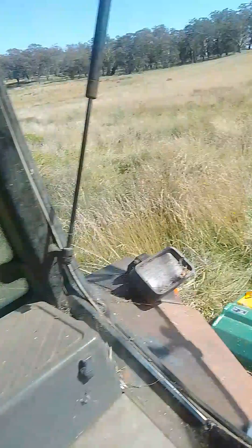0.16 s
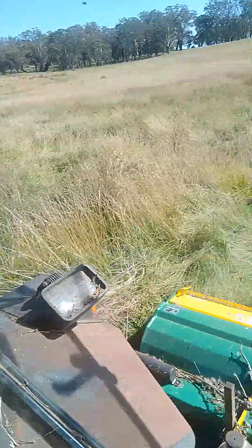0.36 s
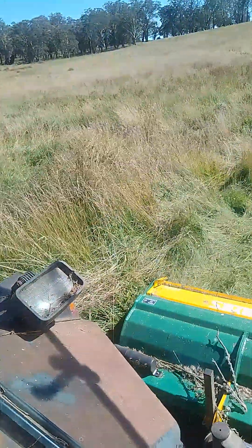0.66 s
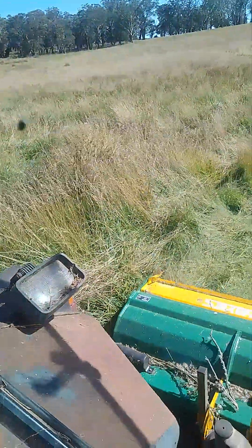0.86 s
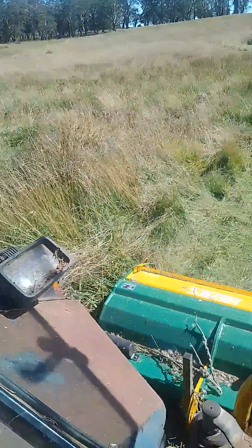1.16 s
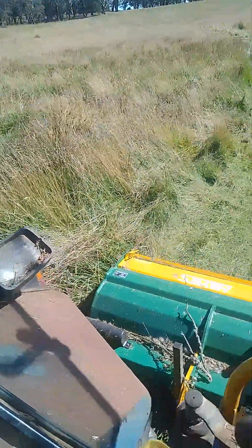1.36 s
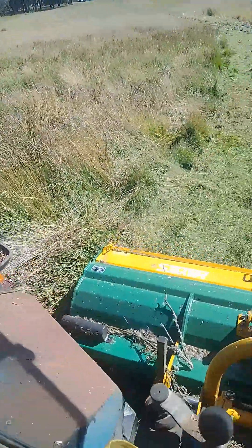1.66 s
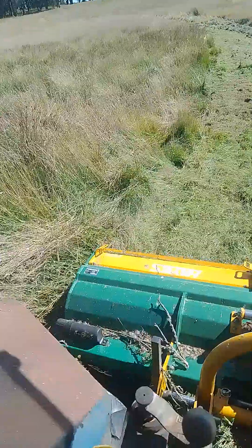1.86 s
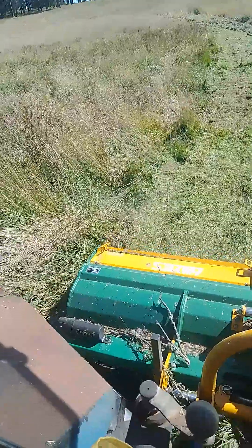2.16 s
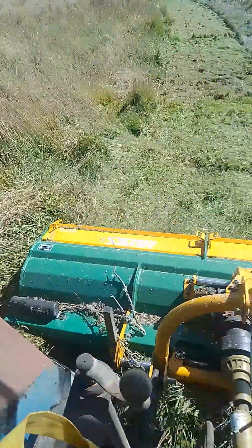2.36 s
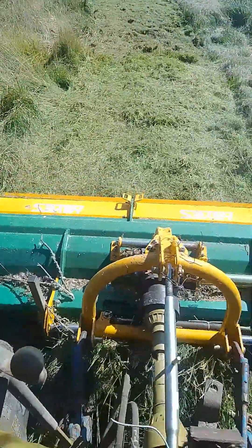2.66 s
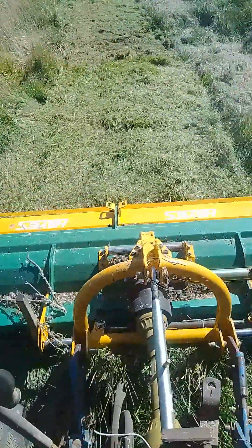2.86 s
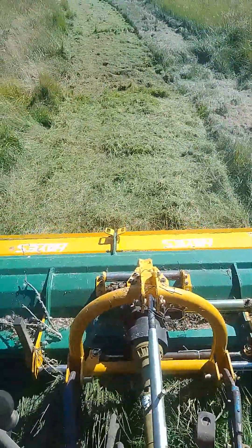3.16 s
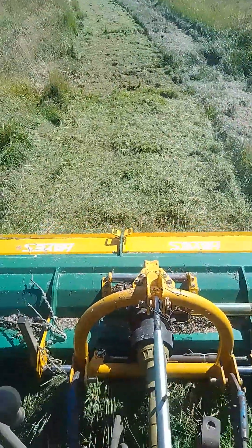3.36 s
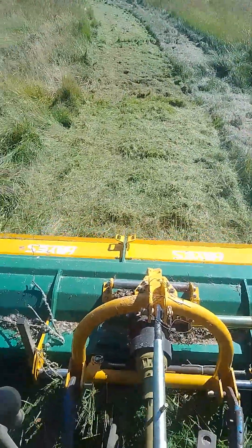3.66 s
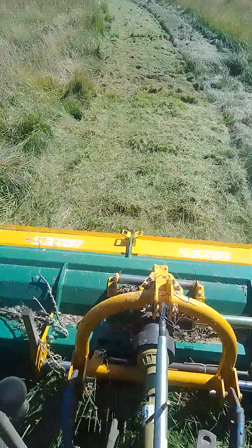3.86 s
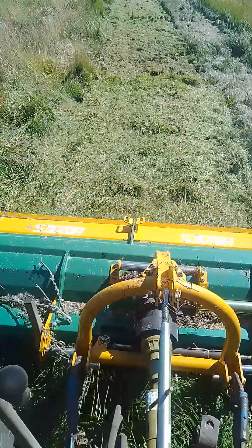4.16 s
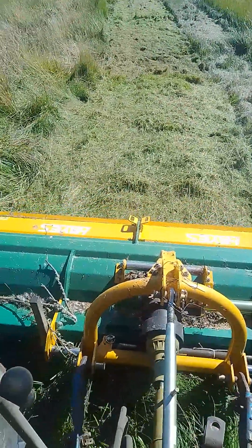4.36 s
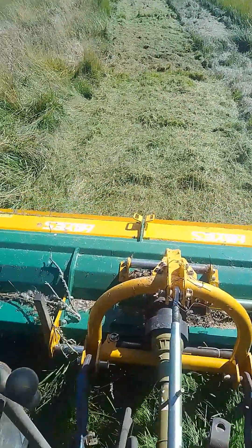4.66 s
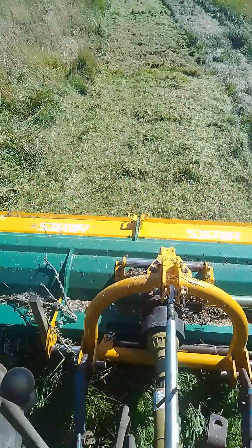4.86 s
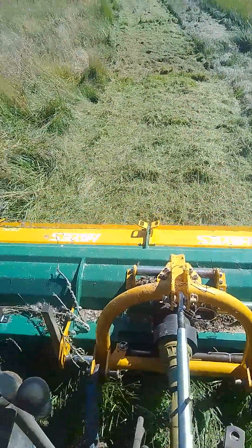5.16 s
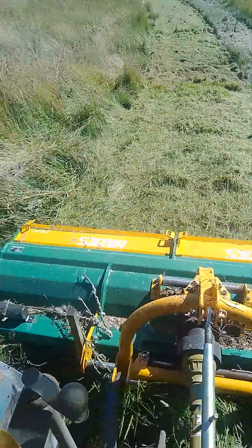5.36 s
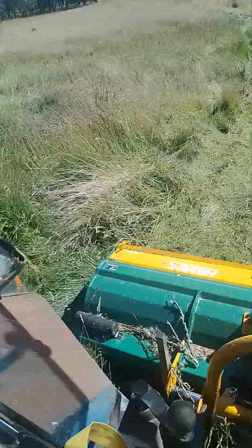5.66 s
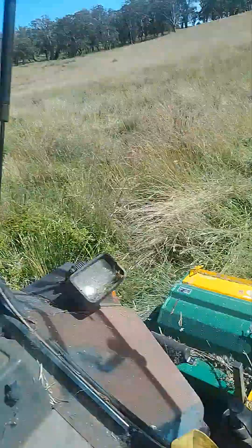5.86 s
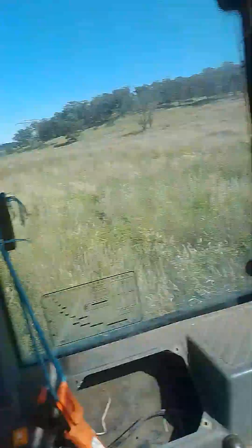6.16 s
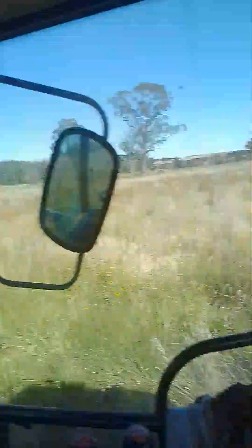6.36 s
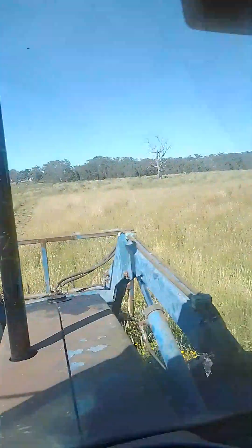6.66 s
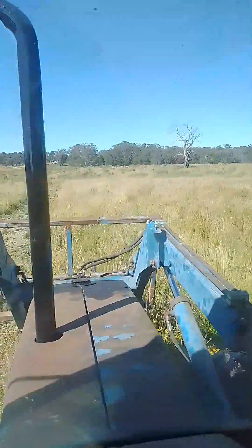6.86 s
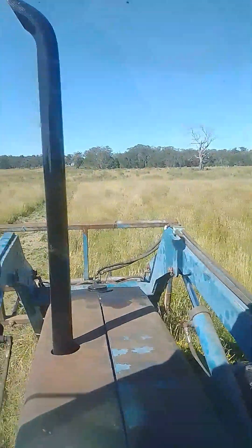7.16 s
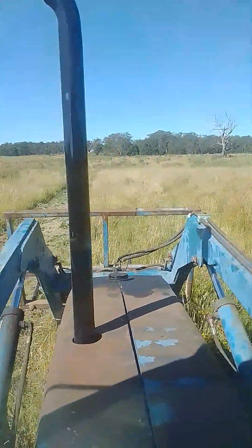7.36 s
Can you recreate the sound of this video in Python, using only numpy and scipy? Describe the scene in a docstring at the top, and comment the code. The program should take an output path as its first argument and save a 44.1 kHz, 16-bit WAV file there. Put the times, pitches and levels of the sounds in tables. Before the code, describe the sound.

A tractor pulls a flail mower through thick grass, heard on one hand-held microphone in the cab. A broad engine roar and a slightly wavering whine run throughout. Cut stems hiss, and the flails crack on clumps and ring briefly, with a few tiny squeaks early on. The whine grows stronger in the middle as the microphone faces the mower. Near the end it swings forward, and the sound turns duller and a little quieter.

```python
"""In the cab of a tractor that pulls a flail mower through thick grass.
The tooth pulses of a gear pump make a harmonic whine over the broadband roar of engine and hood.
Flails thrash the stems, crack on clumps and ring on their shackles. A hand-held mono microphone swings
from the side to the open rear window and then to the windscreen, which recolours the sound."""
import sys
import numpy as np
from scipy import signal
from scipy.io import wavfile
from scipy.ndimage import uniform_filter1d

SR = 44100
rng = np.random.default_rng(int(sys.argv[2]) if len(sys.argv) > 2 else 0)


def to_wav(s):
    """Save 16-bit WAV."""
    ch = np.atleast_2d(s).T  # columns
    pcm = np.round(np.clip(ch, -1, 1) * 32767)  # PCM
    wavfile.write(sys.argv[1], SR, pcm.astype(np.int16))


N = 331191

# microphone aim and tone colour: t/s, aim for the tractor (0 side, 1 rear, 2 front), tone colour of the thrash
# and cracks (0 to 2, blending their three spectra)
MIC_AIM = [(0, 0.5, 0.), (.6, 0.27, 0.033), (1.2, 0.84, 0.), (1.7, 1.66, 0.55), (2.1, 0.76, 0.9),
           (2.4, 1.3, 0.64), (2.7, 1.1, 0.48), (3.3, 1., 0.88), (4.3, 1., 0.085), (5.3, 1., 0.89),
           (5.7, 1.2, 0.58), (5.9, 0.74, 0.7), (6.15, 2, 0.097), (6.4, 1.6, 0.5), (6.55, 2, 1.73),
           (7, 1.83, 1.2), (7.51, 1.7, 2.07)]
# pump tooth rate, to which rotor and engine are geared: t/s, f/Hz
TOOTH_RATE = [(0, 250.6), (.5, 248.9), (1, 247.6), (1.5, 244), (1.75, 244.5), (2.1, 246.4), (2.5, 246.5),
              (3.15, 246.1), (3.55, 246.7), (3.8, 246.6), (4.25, 243.4), (4.5, 246.3), (4.75, 247.5),
              (5.2, 246.5), (5.55, 247.8), (5.8, 247.2), (6.25, 243.3), (6.75, 245.8), (7, 241.2),
              (7.25, 240.6), (7.51, 242.7)]
# harmonic numbers of the whine
PUMP_HARMONICS = (1, 2, 4, 5, 6, 7, 8, 9, 3, 10, 18, 19)
# steady part of each harmonic: level/dB at side, rear, front
PUMP_LEVELS = [(-42.5, -38.5, -42.5), (-42, -36, -43), (-37.5, -32.5, -39), (-44.5, -39.5, -32.5),
               (-35, -33, -36.5), (-45, -49, -41), (-45, -40, -46), (-31, -41.5, -41), (-50, -46, -40.5),
               (-40, -39, -40), (-47, -49, -53), (-44, -45, -52)]
# swells of each harmonic as the cab's standing waves pass the microphone: centre t/s, length/s, level/dB
STANDING_WAVES = [
    [(1.95, 0.43, -40), (6.42, 0.52, -31)],
    [(1.9, 1.2, -36), (3.5, 2.3, -38.5)],
    [(.6, 0.72, -31.5), (2., 0.95, -30.5), (2.75, 0.45, -31), (3.65, 1.014, -23), (4.75, 0.68, -25.5),
     (5.45, 0.65, -20.5), (6.75, .3, -29)],
    [(1.6, 0.66, -37), (2.75, 0.66, -28), (4.15, 0.75, -24), (4.9, 0.93, -26), (5.9, 0.24, -30.5),
     (6.8, 0.65, -27.5)],
    [(1., 0.64, -36), (2.05, .5, -33), (2.95, 1.1, -27.5), (4.1, 0.81, -24.5), (5.1, 0.55, -30),
     (5.85, 0.41, -30)],
    [(1.35, 0.26, -34), (3.5, 0.97, -30), (4.85, 0.58, -26.5), (5.35, 0.5, -28), (5.85, 0.37, -32),
     (7.2, 0.73, -31.5)],
    [(.15, 0.22, -30), (.7, 0.55, -35), (3.35, 0.68, -36), (4.85, 0.4, -33), (5.45, 1, -35), (7., .8, -35)],
    [(.58, 0.34, -26.5), (2.25, 1.1, -34), (3.8, 0.44, -36), (4.9, 0.86, -29), (5.55, 0.44, -24),
     (6.58, 0.21, -28.5)],
    [(1.1, 0.47, -37), (4.6, .4, -42), (7.35, 0.7, -39)],
    [(.95, .5, -34.5), (2.55, .2, -35), (4.75, .7, -39.5), (5.85, .3, -34)],
    [(2.2, 1., -37), (4.15, .6, -36)],
    [(2.3, .6, -40), (5.2, 1.4, -38)],
]
# tones of a shaft at a quarter of the tooth rate: multiple of tooth rate, level/dB re harmonic 4
SIDEBANDS = [(3.75, -11.5), (4.25, -16.)]
# strength of the two main noises: t/s, roar level/dB, thrash level/dB
NOISE_LEVELS = [(0, -22.5, -21), (.4, -21, -17.8), (1.3, -21, -17.4), (1.7, -20, -18), (2.2, -20, -19),
                (2.6, -18.5, -19.5), (3.1, -18.5, -20.5), (3.5, -19.8, -21.5), (4.1, -21, -22),
                (4.5, -18.5, -20), (4.9, -20.3, -23.5), (5.2, -20, -23.5), (5.6, -21.5, -22),
                (5.85, -21, -20.8), (6.2, -22.8, -21), (6.55, -23, -25), (7, -23, -25), (7.25, -25, -27),
                (7.51, -23, -25.5)]
# spectra of engine and hood, cut stems and blows: f/Hz, relative level/dB; the roar has one per aim (side,
# rear, front), the thrash and cracks one per step of tone colour
ROAR_SPECTRA = [
    [(12, -55), (20, -23), (54, -36), (108, -22), (174, -37), (235, -10), (339, -11.5), (403, -4),
     (570, -8), (805, -10), (978, -6.5), (1160, -7), (2080, -8.5), (2270, -2), (3500, -10.5), (4550, -30),
     (7700, -120)],
    [(12, -71), (20, -71), (108, -25), (174, -43), (235, -16), (298, -16.5), (490, -10.5), (608, -12.5),
     (805, -9), (978, -0.5), (1140, -5), (1470, -3.5), (1570, -7), (2220, -8), (3500, -29), (4550, -64),
     (7700, -120)],
    [(12, -51), (20, -15), (120, -18.5), (174, -27), (235, -6.5), (412, -8.5), (490, -3.5), (534, -7.5),
     (957, -4.5), (1110, -6), (1210, 1), (1540, -10.5), (1680, 3.5), (1790, -1.5), (3500, -14.5),
     (4550, -45), (7700, -120)],
]
THRASH_SPECTRA = [
    [(1470, -26), (2500, -4), (3000, -7), (4020, -4), (4340, -2.5), (5420, -3), (7950, -1.5), (9630, -7.5),
     (10500, -12), (13400, -11.5), (15600, -12.5)],
    [(1470, -46), (2500, -1), (3240, -2.5), (4240, 2), (4940, 0), (5300, -0.5), (5990, -2.5), (8200, -3),
     (10800, -15), (13500, -10), (15600, -12)],
    [(1470, -27), (2500, -10), (2560, -12), (3750, -6), (4610, -14), (5060, -9.5), (6080, -15), (8260, -15),
     (10600, -23), (12900, -21), (15600, -35)],
]
CRACK_SPECTRA = [
    [(1500, -40), (3000, -16), (4500, -6), (6000, -2), (8000, 0), (10500, -12), (13000, -15), (15600, -18)],
    [(1500, -40), (3000, -16), (4500, -4), (6000, -2), (8000, 0), (10500, -7), (13000, -7), (15600, -10)],
    [(1500, -40), (3000, -12), (4500, -2), (6000, -2), (8000, -3), (10500, -10), (13000, -13), (15600, -17)],
]
# panel resonances: f/Hz, width/Hz, gain/dB at side, rear, front
PANEL_MODES = [(109.4, 14.5, 18, 9, 4.), (130, 12, 5., 7., 9.4), (319, 27, 7.5, 0.65, 13),
               (399.5, 52, 7.5, 10.2, 1.1), (535.5, 10.3, 3, 10.2, 2.), (598, 27, 4, 0.89, 10),
               (704, 71, 9, 2.6, 1.2), (937, 64, 6, 1.1, 1.82), (975, 44, 2, 3.9, 3.9),
               (1320, 46, -2, 2.7, 3.97), (2230, 31, 7., 3.6, 6.8)]
# clumps struck hard: t/s, puff level/dB, f/Hz near which the flail rings
HARD_BLOWS = [(0.028, -17, 6800), (.0618, -14.5, 7340), (.1022, -15, 7300), (0.139, -13, 7340),
              (.2199, -9.5, 7830), (0.25, -19, 6980), (.2882, -13, 8060), (0.41, -11, 7200),
              (.5162, -21, 5030), (.556, -13, 4360), (.7048, -15, 5930), (.7452, -20, 7200),
              (.8205, -13, 8260), (.8934, -23, 4800), (.9308, -16, 7980), (.9752, -15, 8060),
              (1.0485, -16, 5850), (1.131, -15, 8140), (1.1682, -13, 8000), (1.271, -12, 7050),
              (1.4331, -14, 6660), (1.508, -16, 6400), (1.5469, -17, 7940), (1.6626, -15, 4260),
              (1.8956, -18, 4730), (1.9732, -23, 4870), (2.0113, -18, 5620), (2.2403, -19, 7360),
              (2.6983, -20, 4630), (2.8913, -19, 7020), (3.1213, -16.5, 5690), (3.1916, -18, 4730),
              (3.5952, -18, 6780), (3.9025, -19, 4384), (4.1475, -18, 6280), (4.4243, -15.5, 7470),
              (5.2889, -21.5, 4695), (5.512, -16.5, 6930), (5.6655, -17.5, 4470), (5.7583, -19, 8200),
              (5.8341, -22, 4660), (6.12, -16.5, 6900)]
# flail resonances: f/Hz, relative level/dB, T60/s
FLAIL_MODES = [(4340, -25, 0.038), (5160, 2, 0.047), (5870, -5, 0.054), (6700, 2, 0.034), (7390, -3, 0.053),
               (8000, -1, 0.042), (8470, 5.5, 0.043), (8300, -4, 0.02)]
# a shackle rubs: t/s, length/s, f/Hz, level/dB
SHACKLE_RUBS = [(.422, .03, 4366, -23), (.553, .03, 4360, -22), (1.245, .04, 4370, -26),
                (1.29, .03, 4360, -26), (1.46, .06, 4250, -26), (1.533, .015, 4440, -25)]
# hum of rotor and engine: harmonic number, relative level/dB
ROTOR_ORDERS = [(1, 2), (2, -17), (3, -15), (4, 11), (5, 9)]
ENGINE_ORDERS = [(1, -0.5), (2, -8)]
# base of the hum, rotor then engine: level/dB at side, rear, front
HUM_LEVELS = [(-61, -76, -61), (-59, -63, -50)]

ROTOR_PER_TOOTH, FIRINGS_PER_TOOTH = .10615, .2053


def pump_whine(t, tooth_cycles, rotor_turns, aim):
    """Periodic tooth pulses give harmonics that sag with load; rotor unbalance modulates their amplitude."""
    tooth_cycles = tooth_cycles + np.cumsum(.17 * drift(5)) / SR
    levels_db = []
    for steady_db, swells in zip(PUMP_LEVELS, STANDING_WAVES):
        power = gain_of(aimed(steady_db, aim)) ** 2 + sum(swell(t, *row) ** 2 for row in swells)
        levels_db.append(10 * np.log10(power))
    orders = list(zip(PUMP_HARMONICS, levels_db)) + [(k, db + levels_db[2]) for k, db in SIDEBANDS]
    flutter = 1 + (.12 + .1 * drift(2)) * np.cos(2 * np.pi * rotor_turns)
    return flutter * tones(tooth_cycles, orders, waver_db=1.6, waver_hz=20, skirt=.035)


def engine_roar(level_db):
    """Broadband noise is filtered by the panel resonances of cab and hood."""
    gain = gain_of(level_db + .98 * drift(18.7))
    return gain * blended_noise(ROAR_SPECTRA, size=4096, patchy_db=1, blend_column=0, peaks=PANEL_MODES)


def stem_thrash(level_db, rotor_turns):
    """Countless cuts merge into hiss; the rows of flails modulate its treble once and twice a turn."""
    angle = 2 * np.pi * rotor_turns
    pulse_db = (.15 + .35 * drift(8)) * np.cos(angle) + .21 * np.cos(2 * angle)
    hiss = blended_noise(THRASH_SPECTRA, size=512, patchy_db=1.2, blend_column=1)
    low = signal.oaconvolve(hiss, signal.firwin(101, 4200, fs=SR), "same")
    body = low * gain_of(1.47 * drift(26))
    treble = (hiss - low) * gain_of(pulse_db + .56 * drift(17))
    return gain_of(level_db) * (body + treble)


def flail_cracks(level_db, rotor_turns, rise_s=.0045, cut_at_turn=.76, stray_per_s=25):
    """Impacts give noise puffs that add in power: hard blows, one cut each turn and strays at random."""
    t = np.arange(1500) / SR
    envelope = (t / rise_s * np.exp(1 - t / rise_s)) ** 1.5
    onsets, puff_db, _ = np.transpose(HARD_BLOWS)
    power = impulses(onsets, gain_of(puff_db) ** 2)
    each_turn = np.diff(np.floor(rotor_turns - cut_at_turn), prepend=-1) > 0
    turn_db = level_db - 5.5 + 2.5 * rng.standard_normal(N)
    power += gain_of(turn_db) ** 2 * each_turn
    stray_db = level_db - 4.5 + 1.2 * np.minimum(rng.exponential(1, N), 3)
    power += gain_of(stray_db) ** 2 * (rng.random(N) < stray_per_s / SR)
    gain = np.sqrt(abs(signal.oaconvolve(power, envelope ** 2)[:N]))
    return gain * blended_noise(CRACK_SPECTRA, size=256, patchy_db=3, blend_column=1)


def flail_clinks(level_db, ring_db=5, taps_per_s=20):
    """Damped modes ring freely: a hard blow excites those near its pitch, faint random taps excite all."""
    t, out = np.arange(4000) / SR, np.zeros(N)
    onsets, puff_db, near_hz = np.transpose(HARD_BLOWS)
    for hz, db, t60 in FLAIL_MODES:
        excitation = gain_of(puff_db + ring_db) / (1 + ((hz - near_hz) / 500) ** 2)
        taps = gain_of(level_db - 7) * rng.standard_normal(N) * (rng.random(N) < taps_per_s / SR)
        mode = gain_of(db - 60 * t / t60) * np.minimum(t / .008, 1) * np.sin(2 * np.pi * hz * t)
        out += signal.oaconvolve(impulses(onsets, excitation) + taps, mode)[:N]
    return out


def shackle_squeaks(t):
    """Friction in a shackle sustains a short pure tone with soft ends."""
    out = np.zeros(N)
    for onset, length, hz, db in SHACKLE_RUBS:
        envelope = np.exp(-(2 * (t - onset) / length - 1) ** 4)
        out += np.sqrt(2) * gain_of(db) * envelope * np.sin(2 * np.pi * hz * t)
    return out


def machine_hum(rotor_turns, firings, aim):
    """Rotor unbalance and engine firing force vibration at low harmonics of their rates."""
    rotor_gain, engine_gain = (gain_of(aimed(db, aim)) for db in HUM_LEVELS)
    rotor = rotor_gain * tones(rotor_turns, ROTOR_ORDERS, waver_db=1.5, waver_hz=4)
    return rotor + engine_gain * tones(firings, ENGINE_ORDERS, waver_db=1.5, waver_hz=3)


def moan(t, hz=420, fade_s=1.2):
    """Random modulation spreads a tone into a narrow band; it swells once and fades."""
    envelope = gain_of(-43) * np.exp(-(t / fade_s) ** 6) + swell(t, centre=.68, length=.28, db=-34)
    angle = 2 * np.pi * hz * t
    return envelope * ((2.1 + drift(11)) * np.cos(angle) + drift(7) * np.sin(angle)) / 1.4


def tones(cycles, orders, waver_db, waver_hz, skirt=0):
    """Wavering partials superpose; quadrature noise adds a skirt that grows with the order."""
    out = 0
    for k, db in orders:
        angle = 2 * np.pi * (k * cycles + rng.random())
        gain = gain_of(db + waver_db * drift(waver_hz))
        out += gain * (np.sin(angle) + skirt * k * drift(22) * np.cos(angle))
    return np.sqrt(2) * out


def blended_noise(spectra, size, patchy_db, blend_column, peaks=()):
    """Fourier synthesis of unit-rms noise whose spectrum blends between the given spectra along one column of
    MIC_AIM (aim or tone colour), with drifting patches."""
    hop = size // 4
    frames, hz = N // hop + 5, np.fft.rfftfreq(size, 1 / SR)
    aim = np.clip(curves(MIC_AIM, np.arange(frames) * hop / SR)[blend_column], 0, 2)
    db = 0
    for k, points in enumerate(spectra):
        point_hz, point_db = np.transpose(points)
        shape_db = np.interp(np.log(hz + 1), np.log(point_hz), point_db)
        shape_db += sum(boost[k] / (1 + (2 * (hz - f) / width) ** 2) for f, width, *boost in peaks)
        db += np.outer(shape_db, np.maximum(1 - abs(aim - k), 0))
    magnitude = gain_of(db)
    magnitude /= np.sqrt((magnitude ** 2).sum(0) / len(hz))
    real, imag, patches = rng.standard_normal((frames, len(hz), 3)).T
    for axis in (0, 1):
        patches = uniform_filter1d(patches, size=10, axis=axis)
    spectrum = magnitude * gain_of(patchy_db * unit_rms(patches)) * (real + 1j * imag)
    return unit_rms(signal.istft(spectrum, nperseg=size, noverlap=size - hop)[1][:N])


def swell(t, centre, length, db):
    """A flat-topped bell of gain."""
    return gain_of(db) * np.exp(-(2 * (t - centre) / length) ** 4 / 2)


def drift(hz):
    """Unit-rms noise, low-passed at hz."""
    return unit_rms(signal.lfilter(*signal.butter(2, 2 * hz / SR), rng.standard_normal(N)))


def aimed(db, aim):
    """A level interpolated between side, rear and front."""
    return np.interp(aim, np.arange(len(db)), db)


def curves(rows, t):
    """Each column after the first, interpolated at times t."""
    times, *columns = np.transpose(rows)
    return [np.interp(t, times, column) for column in columns]


def impulses(onsets, weights):
    return np.bincount(np.round(onsets * SR).astype(int), weights, N)[:N]


def gain_of(db):
    return 10 ** (np.asarray(db) / 20)


def unit_rms(x):
    return x / np.sqrt(np.mean(x ** 2) + 1e-20)


def scene():
    """The sources superpose at one microphone; gearing locks pump, rotor and engine together."""
    t = np.arange(N) / SR
    roar_db, thrash_db = curves(NOISE_LEVELS, t)
    aim = curves(MIC_AIM, t)[0]
    tooth_cycles = np.cumsum(curves(TOOTH_RATE, t)[0]) / SR
    rotor_turns, firings = ROTOR_PER_TOOTH * tooth_cycles, FIRINGS_PER_TOOTH * tooth_cycles
    mix = pump_whine(t, tooth_cycles, rotor_turns, aim) + machine_hum(rotor_turns, firings, aim)
    mix += engine_roar(roar_db) + moan(t)
    mix += stem_thrash(thrash_db, rotor_turns) + flail_cracks(thrash_db, rotor_turns)
    mix += flail_clinks(thrash_db) + shackle_squeaks(t)
    return np.array([mix, mix])


def record(dry):
    """Soft saturation rounds the peaks; a low-pass filter limits the band."""
    ceiling, cutoff_hz = .62, 15720
    saturated = ceiling * np.tanh(dry / ceiling)
    lowpass = signal.firwin(1023, cutoff_hz, window=("kaiser", 9), fs=SR)
    return signal.oaconvolve(saturated, lowpass[None], "same")


dry = scene()
out = record(dry)
to_wav(out)
```